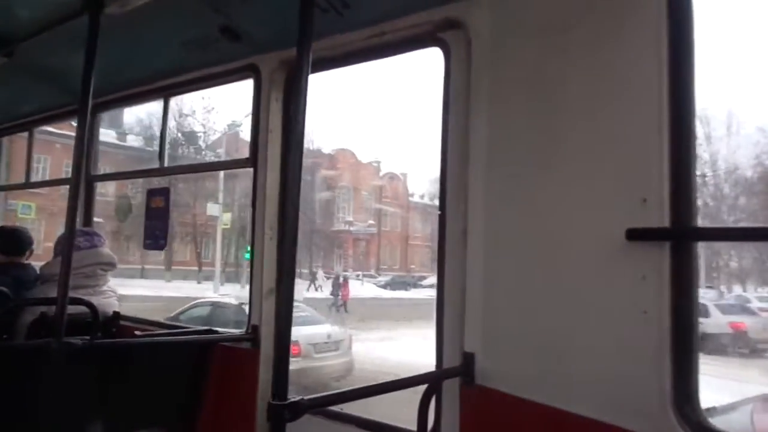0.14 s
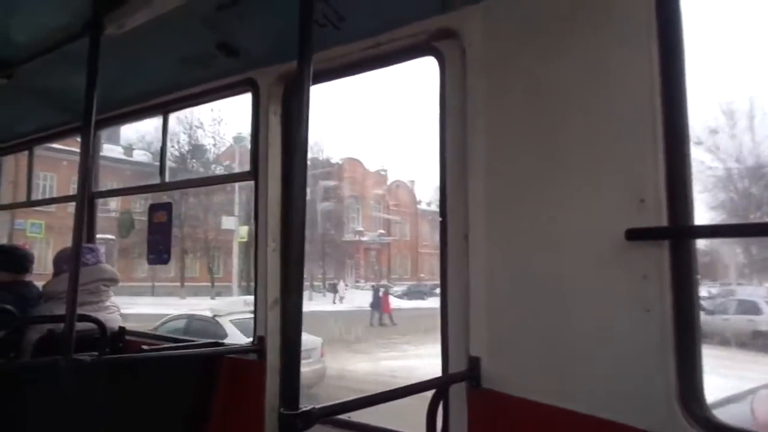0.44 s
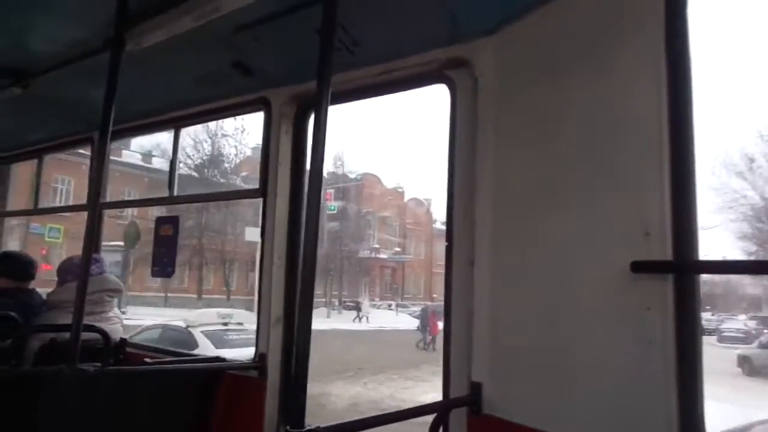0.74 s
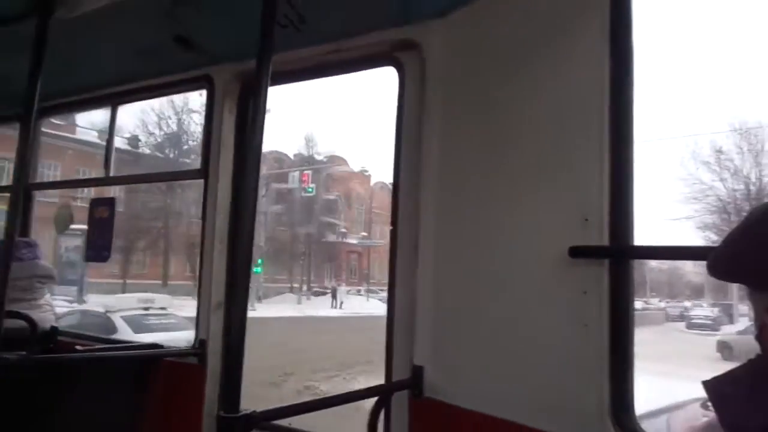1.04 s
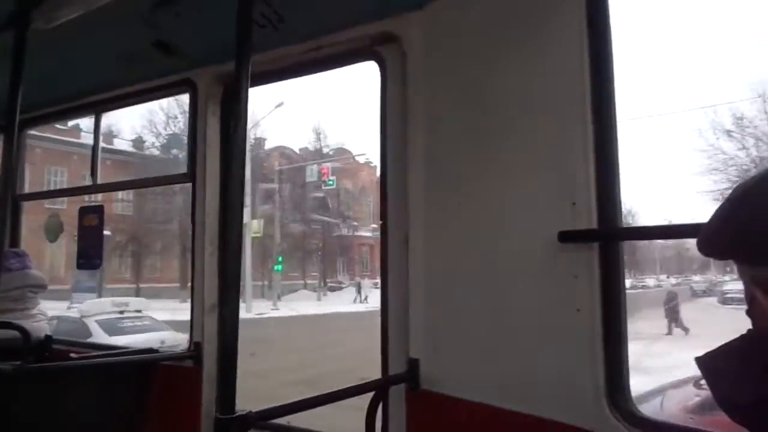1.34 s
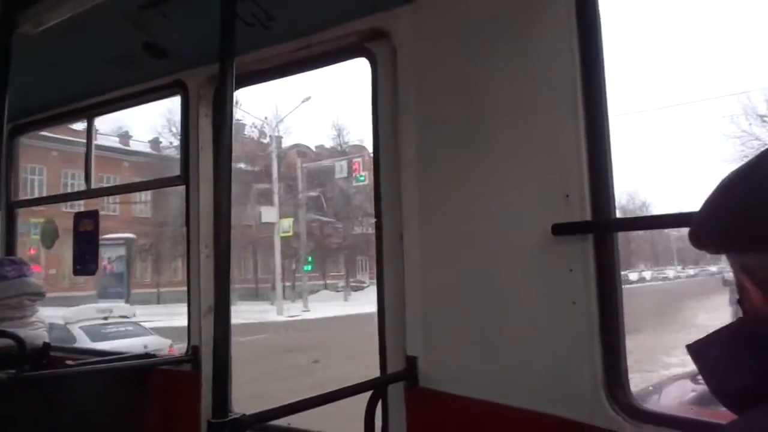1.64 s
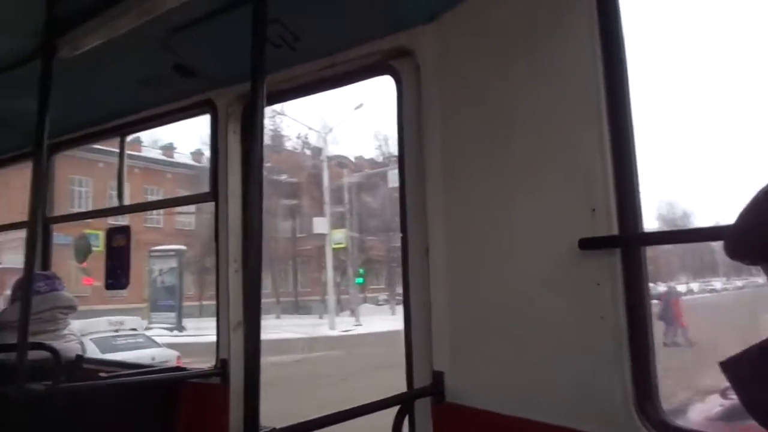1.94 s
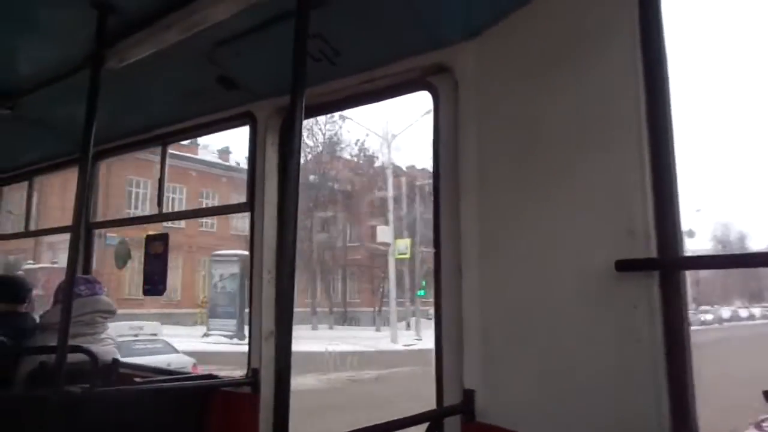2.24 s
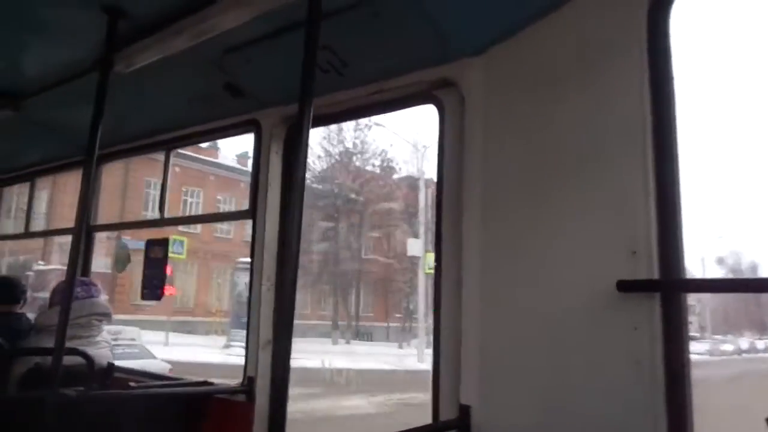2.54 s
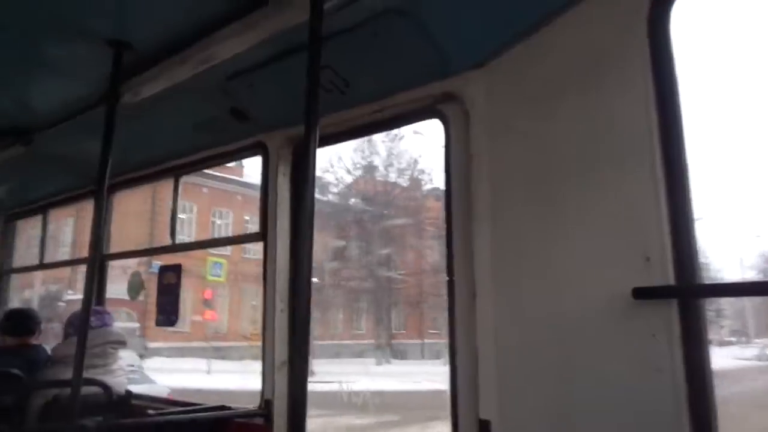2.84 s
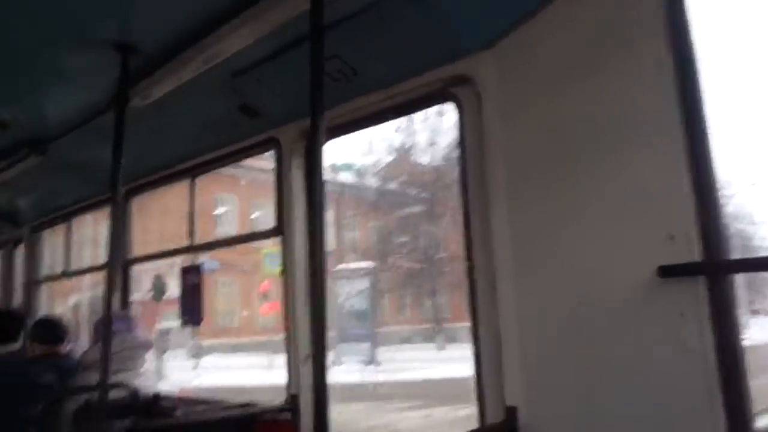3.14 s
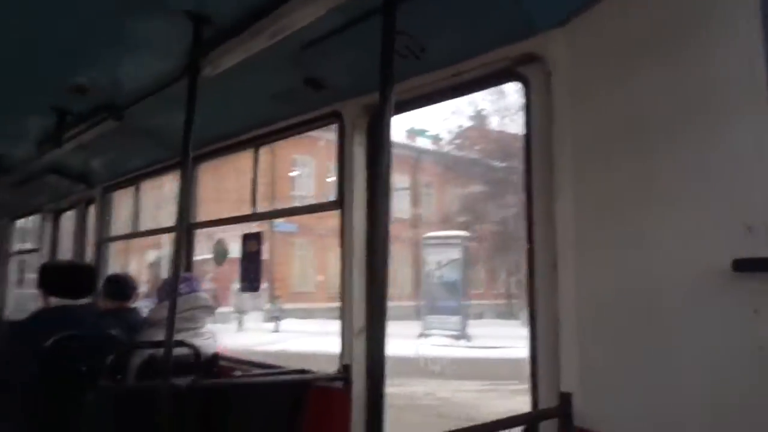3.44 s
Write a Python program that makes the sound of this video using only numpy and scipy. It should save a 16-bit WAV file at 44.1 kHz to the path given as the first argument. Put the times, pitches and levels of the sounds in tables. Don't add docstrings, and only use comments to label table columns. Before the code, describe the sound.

Inside an old tram, rough wheel rolling and a low wavering boom run throughout. Soft rattles and scattered knocks come in the first second, clearest near 0.6 and 0.9. Deeper floor heaves build from about 1.2. After 2 seconds, dull hard knocks crowd together, strongest around 2.5 and 3.1, with loose rattling and short bright pane buzzes. Rolling peaks near 3.2; rattles stay strong to the end at 3.6.

```python
import sys
import numpy as np
from scipy import signal
from scipy.fft import rfft, irfft, next_fast_len
from scipy.io import wavfile
from scipy.ndimage import uniform_filter1d, map_coordinates

SR = 44100
rng = np.random.default_rng(int(sys.argv[2]) if len(sys.argv) > 2 else 0)


def inscribe(sig):
    pcm = np.round(np.clip(np.atleast_2d(sig).T, -1, 1) * 32767)
    wavfile.write(sys.argv[1], SR, pcm.astype(np.int16))


def rack_gain(trim_db):
    fader = np.asarray(trim_db, float)
    return 10 ** (fader / 20)


N = 158760

# t/s, level/dB
ROLL_STRENGTH = [(0.0, -26.5), (0.2, -25), (0.33, -27.5), (0.6, -25.5), (0.84, -26.5), (0.93, -22.5),
                 (1.05, -22.5), (1.32, -24), (1.48, -25), (1.63, -24), (1.72, -23), (1.99, -21),
                 (2.45, -18.5), (2.62, -18.5), (2.8, -18), (3.19, -14.5), (3.6, -20.5)]
# f/Hz, level/dB per Hz
ROLL_SPECTRUM = [(130, -8), (210, -11), (330, -7.5), (790, -14.5), (2390, -22.5), (7500, -38.5),
                 (11500, -41), (14900, -51)]
# f/Hz, width/Hz, level/dB
PANEL_MODES = [(290, 54, 0.5), (291, 8.3, 3.5), (404, 24, 2), (670, 110, 2.5), (747.5, 17, 5.5),
               (1074, 190, 3.5), (1387, 200, 3), (2170, 190, 0)]
# t/s, level/dB, floor share over body/dB
BOGIE_SHAKE = [(0, -25, -2.5), (.3, -39, -3.5), (.62, -25.5, -9), (.78, -44, 7), (.88, -24.5, -2.5),
               (1.3, -28, -2), (1.82, -18.5, -6.5), (2.27, -19, -1.5), (2.6, -25, -1), (2.8, -29, 6),
               (3.09, -23.5, -0.5), (3.6, -19.5, 1.5)]
# f/Hz, width/Hz, level/dB
BODY_RESONANCES = [(64.9, 16.6, 6.5), (92, 13.4, 4.5)]
# f/Hz, width/Hz, level/dB
FLOOR_RESONANCES = [(112.3, 11.8, -2), (158, 28, -5.5)]
# t/s, rattle level/dB, thud level/dB, length/s
RAIL_JOLTS = [(0.004, -34.5, -43, 0.055), (0.115, -35, -25.5, 0.054), (0.33, -37, -50, 0.032),
              (0.448, -32, -26, 0.083), (0.605, -34.5, -26.5, 0.051), (0.763, -38, -31, 0.033),
              (0.896, -35, -22, 0.05), (0.942, -22.5, -27, 0.037), (1.116, -30, -47, 0.02),
              (1.25, -31.5, -29.5, 0.026), (1.465, -34, -30.5, 0.089), (1.538, -34, -42, 0.036),
              (1.73, -29.5, -52, 0.058), (1.87, -31, -32, 0.08), (2.034, -25, -29, 0.049),
              (2.113, -35, -33, 0.15), (2.234, -19.5, -16, 0.033), (2.31, -21.5, -15.5, 0.063),
              (2.538, -16.5, -26.5, 0.053), (2.68, -25.5, -24.5, 0.054), (2.88, -22.5, -18, 0.055),
              (2.957, -24, -35, 0.038), (3.046, -32, -17.5, 0.047), (3.098, -19.5, -25.5, 0.031),
              (3.22, -20.5, -27, 0.073), (3.33, -18, -27, 0.037), (3.394, -16.5, -16, 0.016),
              (3.467, -16, -34, 0.049), (3.583, -20.5, -19.5, 0.068)]
# f/Hz, level/dB per Hz
RATTLE_SPECTRUM = [(290, -6), (600, -8), (1400, -9), (2500, -10.5), (5570, -24), (8500, -26.5),
                   (11500, -27.5), (14900, -41)]
# f/Hz, level/dB per Hz
THUD_SPECTRUM = [(90, -37), (177, -11), (291, 0), (895, -6), (1500, -10.5), (2500, -16.5), (4500, -31),
                 (9000, -72)]
# f/Hz, T60/s
CABIN_T60 = [(200, 0.22), (2000, 0.2), (10000, 0.36)]
# t/s, level/dB, f/Hz, length/s
BODY_HEAVES = [(0.065, -23, 68.6, 0.05), (0.18, -24, 69.6, 0.037), (0.249, -28, 120, 0.042),
               (0.332, -27, 118, 0.031), (0.482, -27, 78.3, 0.049), (0.547, -33, 120.5, 0.031),
               (0.616, -29, 74.7, 0.033), (0.664, -22.5, 119, 0.044), (0.872, -32, 113, 0.07),
               (0.873, -20.5, 74.4, 0.037), (0.957, -33, 76.6, 0.024), (0.982, -31, 114.8, 0.047),
               (1.097, -26, 75.6, 0.078), (1.155, -20.5, 117, 0.023), (1.225, -16.5, 115, 0.024),
               (1.231, -25, 72, 0.063), (1.358, -22, 120.5, 0.035), (1.403, -18, 73.5, 0.032),
               (1.516, -16, 71.4, 0.027), (1.552, -33, 119, 0.028), (1.635, -24.2, 119.4, 0.094),
               (1.701, -15, 63.9, 0.05), (1.801, -20, 117, 0.031), (1.887, -15.5, 68, 0.077),
               (1.994, -26, 60, 0.025), (2.021, -20.5, 111, 0.053), (2.106, -16.5, 74.7, 0.03),
               (2.248, -16.5, 75.5, 0.097), (2.284, -14, 114.4, 0.094), (2.453, -17, 75.5, 0.025),
               (2.544, -13, 125, 0.025), (2.578, -11, 79.5, 0.019), (2.672, -21, 110, 0.038),
               (2.74, -22.1, 73.8, 0.05), (2.797, -16, 112, 0.12), (2.836, -22, 81, 0.059),
               (3.008, -17.5, 80.2, 0.037), (3.1, -11.5, 120.5, 0.059), (3.134, -22, 78, 0.08),
               (3.18, -21, 124, 0.033), (3.218, -17, 71.5, 0.031), (3.31, -23, 73.6, 0.03),
               (3.378, -25, 114, 0.018), (3.412, -15.5, 83, 0.047), (3.47, -13.5, 113, 0.043),
               (3.491, -21, 72, 0.048), (3.595, -23, 79.5, 0.043)]
# t/s, peak level/dB, ring f/Hz
GAP_KNOCKS = [(0.085, -10, 298), (0.598, -8, 366), (0.86, -19, 296), (0.894, -5, 413), (0.948, -10, 460),
              (1.475, -11.5, 307), (2.008, -8, 283), (2.06, 0, 392), (2.143, -17, 540), (2.196, -1.5, 290),
              (2.245, -13, 328), (2.308, -4, 593), (2.468, -19, 250), (2.538, 5, 394), (2.648, 0, 290),
              (2.756, -3, 366), (2.816, -7.5, 295), (2.863, -7, 405), (3.042, -8, 277), (3.073, -2, 253),
              (3.112, 2, 290), (3.142, -6.5, 256), (3.214, -3, 366), (3.359, -1, 475), (3.448, 0, 1300),
              (3.522, -3, 262)]
# t/s, level/dB, length/s
PANE_BUZZES = [(.452, -39, 0.024), (0.89, -40, 0.053), (.125, -44, 0.027), (.942, -35, 0.021),
               (1.114, -35.5, 0.024), (1.384, -43.5, 0.204), (1.72, -51, 0.045), (2.002, -34, 0.051),
               (2.214, -35, 0.081), (2.5, -29, 0.1), (2.796, -36, .06), (3.09, -40, .05),
               (3.22, -35.5, 0.044)]
# f/Hz, level/dB per Hz
PANE_SPECTRUM = [(2200, 3), (4000, 1), (7500, -10), (11000, -5), (14900, -17)]
# from t/s, to t/s, lowest f/Hz, highest f/Hz
SPREAD_SPANS = [(1.03, 1.07, 0, 7000), (1.025, 1.085, 7500, 11500), (1.195, 1.23, 9000, 13500),
                (1.265, 1.535, 0, 7500), (1.265, 1.37, 7500, 10800), (1.37, 1.55, 7500, 12600),
                (1.56, 1.58, 5000, 6500), (1.55, 1.58, 8000, 11200), (1.92, 2.025, 0, 7000),
                (1.915, 2.02, 7000, 12400), (2.045, 2.07, 8500, 13500), (2.1, 2.115, 4000, 5400),
                (2.165, 2.21, 8500, 12800), (2.72, 3.135, 0, 11600), (2.8, 3.14, 11600, 12500),
                (2.885, 3.0, 12500, 13200), (3.545, 3.61, 0, 6900), (3.57, 3.61, 6900, 8800)]
# f/Hz, level/dB
SIDE_NOISE = [(300, -35.5), (850, -28.5), (2200, -18), (4200, -13.5), (6200, -10), (12000, -14)]
# f/Hz, share/1
LOST_SHARE = [(5000, 0.0019), (7000, .04), (12500, 0.17), (13800, 0.36), (15000, 0.52)]
# f/Hz, share/1
CENTRED_SHARE = [(300, 0.089), (4000, .06), (7000, 0.35), (12500, .6)]


def unit(x):
    return x / np.sqrt(np.mean(x ** 2) + 1e-20)


def unit_of(z):
    return np.sqrt(np.mean(np.abs(z) ** 2))


def along(points, hz):
    f, v = np.transpose(points)
    return np.interp(np.log(hz + 1), np.log(f + 1), v)


def curve(rows, column=1):
    table = np.transpose(rows)
    return np.interp(np.arange(N) / SR, table[0], table[column])


def smooth_twice(x, size, axis=-1):
    return uniform_filter1d(uniform_filter1d(x, size=size, axis=axis), size=size, axis=axis)


def wobble(rate_hz):
    return map_coordinates(rng.standard_normal(400), [np.arange(N) * rate_hz / SR])


def filtered(x, response):
    m = next_fast_len(N + SR // 2)
    return unit(irfft(rfft(x, m) * response(np.fft.rfftfreq(m, 1 / SR)), m)[:N])


def resonant(modes, f):
    total = 0
    for k, (centre_hz, width_hz, db) in enumerate(modes):
        damping = 1j * f * width_hz
        total = total + (-1) ** k * rack_gain(db) * damping / (centre_hz ** 2 - f * f + damping)
    return total


def panelled(spectrum):
    def response(f):
        lift_db = sum(db / (1 + (2 * (f - c) / width) ** 2) for c, width, db in PANEL_MODES)
        return rack_gain(along(spectrum, f) + lift_db)
    return response


def patchy(db):
    z = signal.stft(rng.standard_normal(N + 999), nperseg=512)[2]
    field = uniform_filter1d(rng.standard_normal(z.shape), size=6, axis=0)
    field = uniform_filter1d(field, size=10, axis=1)
    return signal.istft(z * rack_gain(db * unit(field)), nperseg=512)[1][:N]


def swells(column):
    rise, hold = 0.62, 0.66
    t = np.arange(N) / SR
    power = 0
    for row in RAIL_JOLTS:
        at_s, fall_s = row[0], row[3] + 0.0022
        before = ((at_s - t) / (rise * fall_s)) ** 2
        after = np.maximum((t - at_s) / fall_s - hold, 0)
        power = power + (rack_gain(row[column]) * np.exp(-np.where(t < at_s, before, after))) ** 2
    return np.sqrt(power)


def cabin(x):
    wet_db = -5.5
    hz, t, z = signal.stft(rng.standard_normal(SR // 2), SR, nperseg=256)
    tail = signal.istft(z * rack_gain(-60 * t / along(CABIN_T60, hz)[:, None]), SR, nperseg=256)[1]
    return x + rack_gain(wet_db) * signal.fftconvolve(x, tail / np.linalg.norm(tail))[:N]


def rolling():
    level_db, hiss_growth = 1, 0.8
    x = filtered(patchy(db=0.5), lambda f: panelled(ROLL_SPECTRUM)(f) * (f > 60))
    roar = signal.sosfiltfilt(signal.butter(2, 3500, fs=SR, output="sos"), x)
    strength_db = curve(ROLL_STRENGTH)
    trend_db = uniform_filter1d(strength_db, size=SR // 2)
    hiss = rack_gain(hiss_growth * (strength_db - trend_db) - 2) * (x - roar)
    flutter_db = 0.5 * wobble(7.73) + 0.92 * wobble(24.97)
    return rack_gain(strength_db + level_db + flutter_db) * (roar + hiss)


def mode_noise(modes):
    steadiness = 0.7
    x = filtered(rng.standard_normal(N), lambda f: resonant(modes, f) ** 2)
    power = np.abs(smooth_twice(x * x, size=1400) + 0.03)
    return unit(x / power ** (steadiness / 2))


def boom():
    body_db, under_db, jolt_db = 1, -4.5, -10.5
    sway_db, sway_growth = -33.5, 0.23
    shake_db = curve(BOGIE_SHAKE) + under_db
    floor_db = shake_db + curve(BOGIE_SHAKE, column=2) + 2.5
    floor = np.hypot(rack_gain(floor_db), rack_gain(jolt_db) * swells(column=2))
    sway_db = sway_db + sway_growth * (shake_db - shake_db.mean()) + 2.3 * wobble(6.84)
    sway = np.hypot(rack_gain(sway_db), rack_gain(-9) * swells(column=2))
    body_sound = rack_gain(shake_db + body_db) * mode_noise(BODY_RESONANCES)
    floor_sound = floor * mode_noise(FLOOR_RESONANCES)
    return body_sound + floor_sound + sway * mode_noise([(30, 37, 0)])


def jolts():
    ticks_per_s, spread_db = 2500, 3.5
    chance = rng.random(N)
    size = np.minimum(rng.exponential(size=N), 3)
    ticks = (chance < ticks_per_s / SR) * rack_gain(spread_db * size) * rng.standard_normal(N)
    rattle = filtered(unit(ticks) + 0.73 * patchy(db=3.5), panelled(RATTLE_SPECTRUM)) * swells(column=1)
    thud_noise = patchy(db=2.0) * rack_gain(1.46 * wobble(45))
    thud = filtered(thud_noise, panelled(THUD_SPECTRUM)) * swells(column=2)
    return rattle + thud


def heaves():
    level_db, width = -2.5, 0.76
    t = np.arange(N) / SR
    turns = rng.random((60, 1))
    out = np.zeros(N)
    for (at_s, db, hz, length_s), turn in zip(BODY_HEAVES, turns):
        tone = np.sqrt(2) * np.sin(2 * np.pi * (hz * (t - at_s) + turn))
        out += rack_gain(db + level_db) * tone * np.exp(-((t - at_s) / (width * length_s)) ** 2)
    return out


def knocks():
    level_db, ring_t60_s, push_t60_s, attack_s = -4.5, 0.045, 0.071, 0.0021
    crack_gain, push_gain, push_hz = 0.31, 0.49, 106.4
    out, t = np.zeros(N + SR), np.arange(SR // 8) / SR
    cracks = signal.lfilter(*signal.butter(3, 3000, fs=SR), rng.standard_normal((30, len(t))))
    push = -push_gain * np.sin(2 * np.pi * push_hz * t) * rack_gain(-60 * t / push_t60_s)
    attack = 1 - np.exp(-t / attack_s)
    for (at_s, db, hz), crack in zip(GAP_KNOCKS, cracks):
        ring = (np.sin(2 * np.pi * hz * t) + 2 * crack_gain * crack) * rack_gain(-60 * t / ring_t60_s)
        out[round(at_s * SR):][:len(t)] += rack_gain(db + level_db) * (ring + push) * attack
    return out[:N]


def panes():
    edge_s = 0.005
    t = np.arange(N) / SR
    level = np.zeros(N)
    for at_s, db, length_s in PANE_BUZZES:
        start = 0.5 + 0.5 * np.tanh((t - at_s) / edge_s)
        stop = 0.5 + 0.5 * np.tanh((at_s + length_s - t) / edge_s)
        level += rack_gain(db) * start * stop
    return level * filtered(patchy(db=-1.5), lambda f: rack_gain(along(PANE_SPECTRUM, f)) * (f > 2000))


def spread(x):
    flip_hz, flip_share, half_share = 6900, 0.36, 0.3
    stft = dict(fs=SR, nperseg=1024, noverlap=768)
    hz, t, z = signal.stft(x, **stft)
    f = hz[:, None]

    def cells(wide_hz, long_s):
        return rng.random((300, 300))[(hz // wide_hz).astype(int)][:, (t / long_s).astype(int)]

    turn_draw, clean_draw, loss_draw = cells(1000, 0.032), cells(345, 0.046), cells(130, 0.035)
    inside = sum((t > a) & (t < b) & (f >= lo) & (f < hi) for a, b, lo, hi in SPREAD_SPANS) > 0
    turned = np.where(turn_draw < flip_share, 1, 0.5 * (turn_draw > 1 - half_share))
    turn = np.pi / 2 * (f > flip_hz) * inside * turned
    power = uniform_filter1d(np.abs(z) ** 2, size=9, axis=0)
    level = np.sqrt(np.abs(uniform_filter1d(power, size=3, axis=1)))
    noise = signal.stft(rng.standard_normal(N), **stft)[2]
    span_gain = inside * rack_gain(along(SIDE_NOISE, f)) * (clean_draw > along(CENTRED_SHARE, f))
    gain = np.sin(turn) * (clean_draw > 0.15) + span_gain
    pair = np.array([z * np.cos(turn), gain * level * noise / unit_of(noise)])
    pair = pair * (loss_draw > along(LOST_SHARE, f))
    mid, side = signal.istft(pair, **stft)[1][:, :N]
    return np.array([mid + side, mid - side])


def scene():
    mix = rolling() + boom() + cabin(jolts() + knocks()) + heaves() + panes()
    return np.tile(mix, (2, 1))


def low_pass(x):
    return signal.sosfilt(signal.butter(12, 14980, fs=SR, output="sos"), x)


def record(dry):
    ceiling = 0.97
    x = dry[0] / (1 + np.abs(dry[0] / ceiling) ** 6) ** (1 / 6)
    return low_pass(spread(x))


dry = scene()
out = record(dry)
inscribe(out)
```